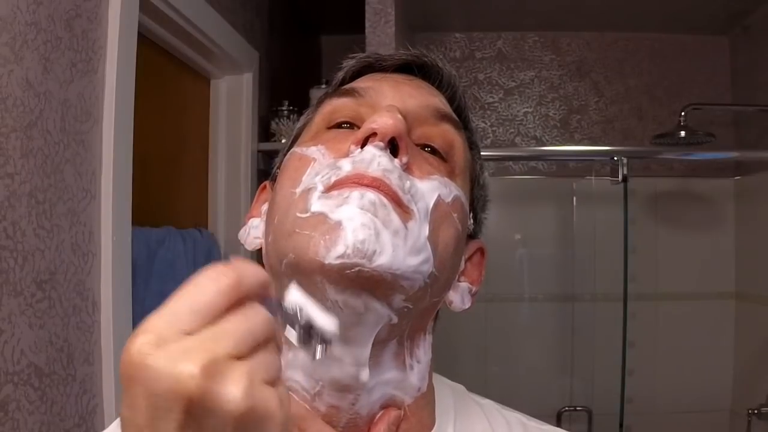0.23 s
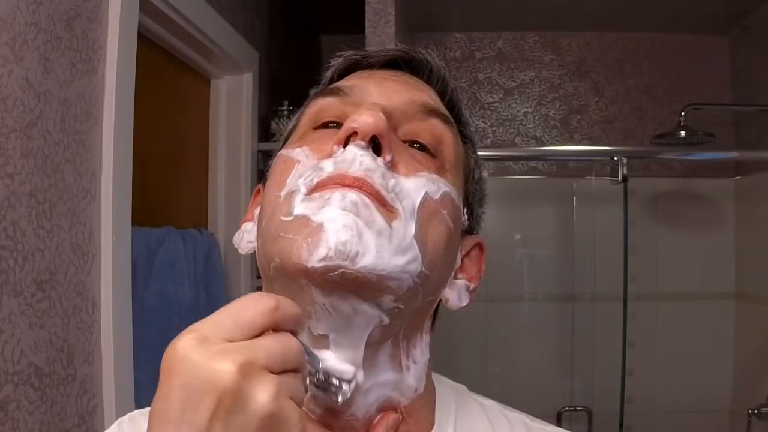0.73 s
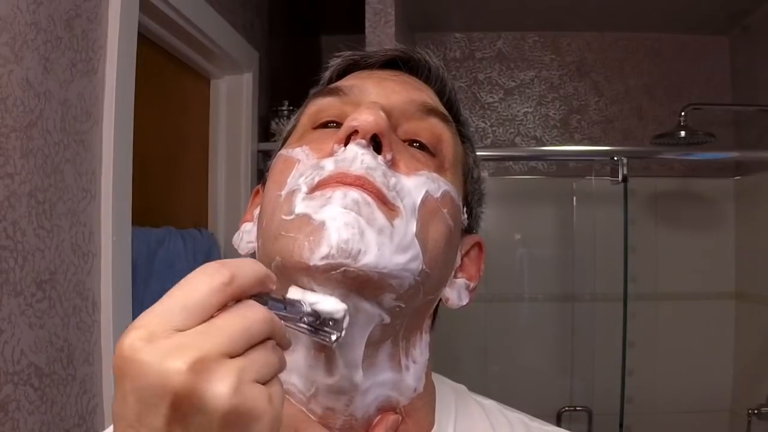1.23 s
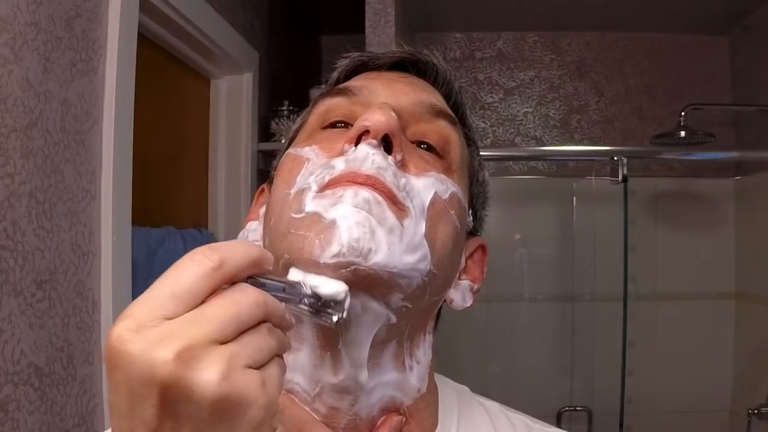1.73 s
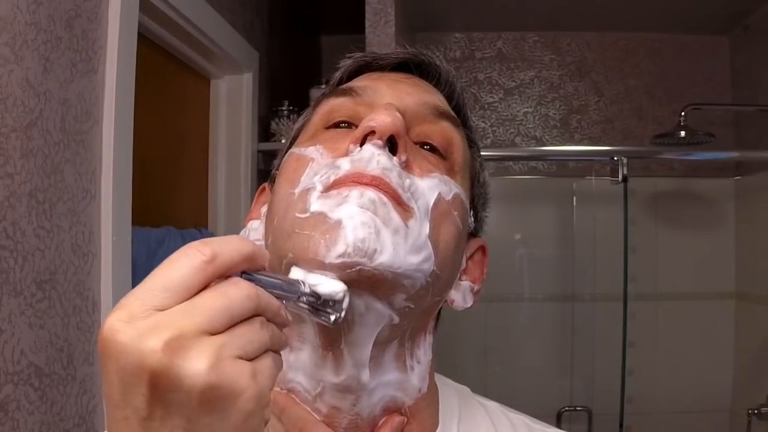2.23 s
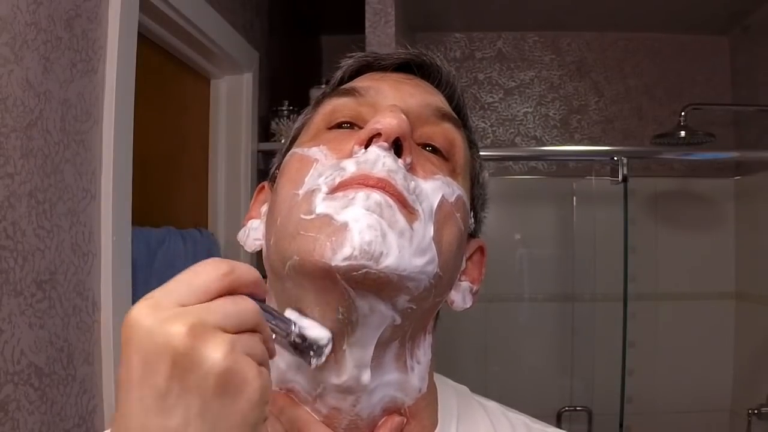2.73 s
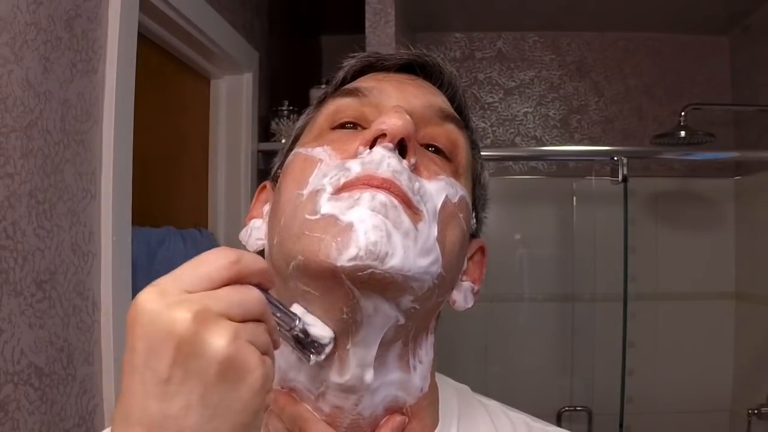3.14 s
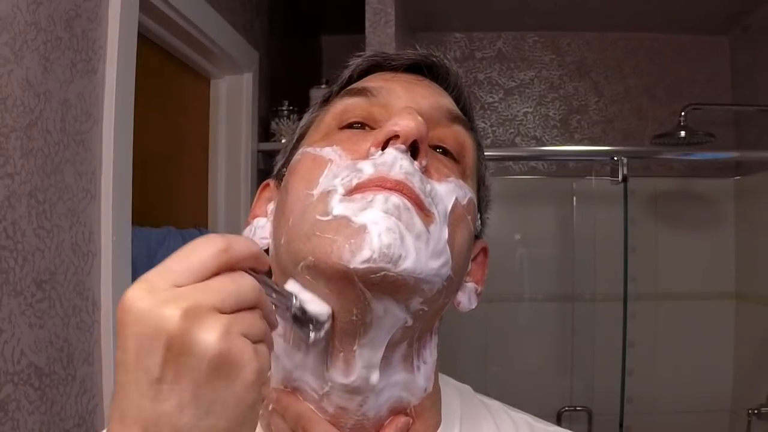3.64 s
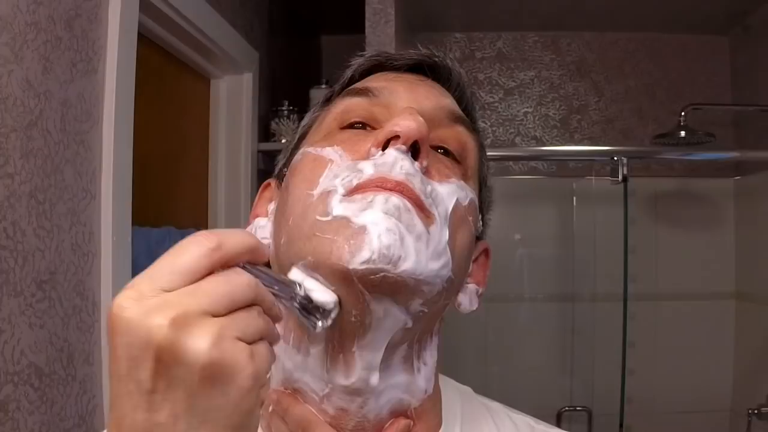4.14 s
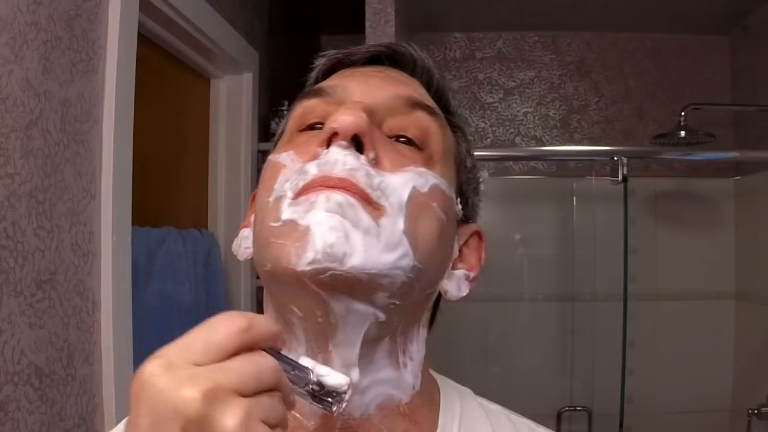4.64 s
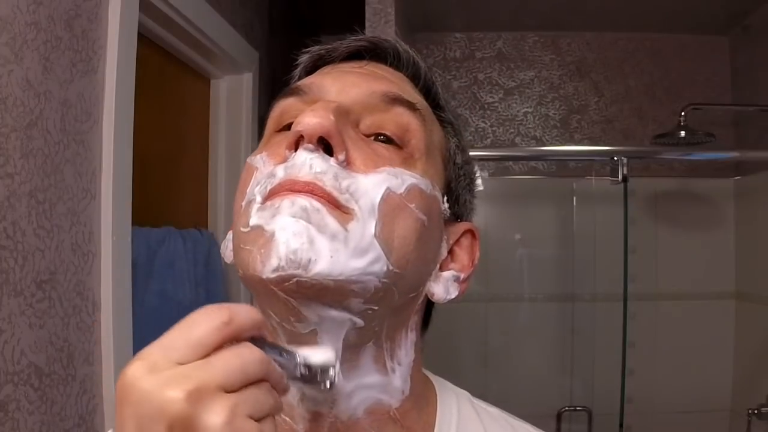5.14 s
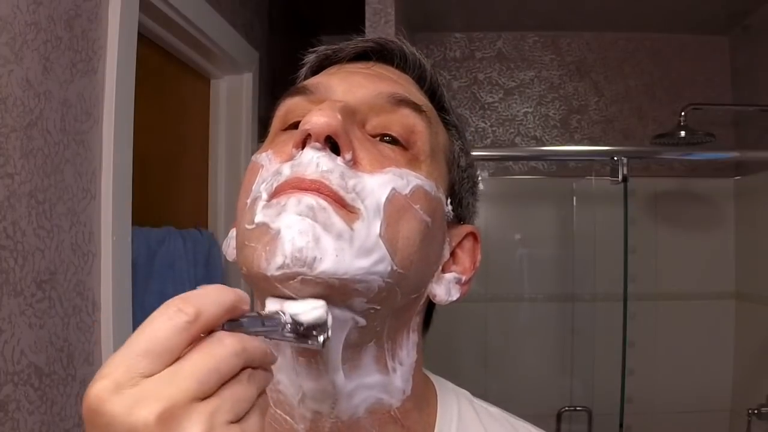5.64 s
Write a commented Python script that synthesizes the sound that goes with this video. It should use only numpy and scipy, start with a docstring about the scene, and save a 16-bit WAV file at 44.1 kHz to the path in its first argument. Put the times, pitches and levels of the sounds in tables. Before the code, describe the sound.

A safety razor scrapes wet, lathered stubble in a small tiled bathroom. A very brief rasp at 0 s is followed by a short scrape at 0.17, then a gap. Foamy swishes lead into softer strokes at 0.57 and 0.86. From 1.2 to 2.1 s firm, gritty strokes come about every 0.3 s, each swelling for under a tenth of a second and cutting off, with sharp snagging ticks. A fainter stroke at 2.3 carries a tiny rising squelch. Strokes from 2.95 to 3.7 sound higher and crisper, with soft low thuds near 3.0, 3.3 and 4.0. Scrapes at 4.25 and 4.5 are weak and duller; after a pause, longer low-pitched rasps with foam fall at 4.9, 5.2 and 5.6, including a strong snag near 5.3. Short dense tile echoes follow everything, over wavering low hum, rumble, light hiss and occasional soft sleeve rustle.

```python
"""Short rasping strokes of a safety razor through lathered stubble, in a small tiled bathroom.
Each hair that the blade cuts is a tiny snap that rings the razor; the guard rubs the wet skin below them.
Sharp snags, foamy swishes, soft thuds and one squelch break up the strokes.
The tiles throw all these back in dense echoes, over a low hum, a soft rumble, hiss and a rustle of cloth."""
import sys
import numpy as np
from scipy import signal
from scipy.fft import rfft, irfft
from scipy.io import wavfile
from scipy.ndimage import uniform_filter1d

SR = 44100
rng = np.random.default_rng(int(sys.argv[2]) if len(sys.argv) > 2 else 0)


def waveform_to_disk(signal):
    """Save audio, clipped to [-1, 1], as 16-bit WAV at the path in sys.argv[1]."""
    frames = np.transpose(np.atleast_2d(signal))
    scaled = np.clip(frames, -1, 1) * 32767
    samples = np.round(scaled).astype(np.int16)
    wavfile.write(sys.argv[1], SR, samples)


N = 258867

# Damped modes of razor head and handle. Each row: centre in Hz, width in Hz, relative level in dB.
RAZOR_MODES = [(1366, 40, -6), (1535, 28, 3), (1646, 32, 3), (1754, 30, -2), (2014, 20, 3), (2122, 50, -4),
               (2278, 30, -3), (2520, 90, -6), (2615, 30, 2), (2908, 55, -1), (3150, 150, -7),
               (3670, 60, -8)]
# Spectrum of the cutting rasp. Each row: frequency in Hz, relative density in dB per Hz.
RASP_SPECTRUM = [(200, -18.5), (900, -19.5), (1280, -9), (1620, 4), (1850, -0.5), (2060, 2.5), (2350, -3),
                 (2650, 5), (3050, 0.5), (3800, -1.5), (4900, -0.5), (5700, -4), (6700, -4.5), (8000, -8),
                 (16000, -23.5)]
# Spectrum of the crisp edge. Each row: frequency in Hz, relative density in dB per Hz.
CRISP_SPECTRUM = [(1500, -18.5), (4000, -1), (5600, -1), (6300, 2), (7700, 3.5), (8500, 5.5), (9200, 7.5),
                  (10300, 3.5), (12500, 3.5), (14000, -0.5), (16000, -3.5)]
# Spectrum of the guard on skin. Each row: frequency in Hz, relative density in dB per Hz.
RUB_SPECTRUM = [(100, -27.5), (180, -9.5), (240, -6), (310, -0.5), (375, -5.5), (450, 9), (505, -4),
                (580, 2), (700, -9.5), (840, -4.5), (950, -1), (1150, -3.5), (2000, -16)]


def razor(rasp_db=-3.0, modes_db=5.5, crisp_db=-2.5, rub_db=-0.5, snag_ring_db=-7,
          focus_width_hz=650, crisp_tilt_db_per_octave=5):
    """Snaps sound directly and through the razor's modes; harder strokes cut more hairs a second."""
    cut, crisp, rub = stroke_gains()
    hairs_per_s = 900 + 4000 * cut / cut.max()
    hairs = snaps(hairs_per_s, spread_db=2.0, smear=0.55) * tufts(depth_db=3.2, length_s=0.014)
    snag = snags()

    centre_hz, lift_db = blade_angle()
    drive = focus(cut * hairs + gain_of(snag_ring_db) * snag, centre_hz, lift_db, focus_width_hz)
    modes = sum(gain_of(db) * ring(drive, hz, width_hz) for hz, width_hz, db in RAZOR_MODES)
    rasp = colour(drive, RASP_SPECTRUM)

    # the thinnest hairs add a fizz of their own, brighter when the scrape sits higher
    thin_hairs = snaps(per_s=2500, spread_db=2.5, smear=0.33) * tufts(depth_db=5.5, length_s=0.016)
    fizz = evened(hairs + thin_hairs)
    tilt_db = crisp_tilt_db_per_octave * np.log2(centre_hz / 2150)
    edge = colour(tilted(crisp * fizz + snag, 10000, tilt_db), CRISP_SPECTRUM)

    skin = colour(rub * snaps(per_s=900, spread_db=4.0, smear=0.76), RUB_SPECTRUM)
    direct = gain_of(rasp_db) * rasp + gain_of(crisp_db) * edge
    return direct + gain_of(modes_db) * modes + gain_of(rub_db) * skin


# Strokes of the blade. Each row: start in seconds, swell in seconds, ease in seconds,
# relative cutting level in dB, level at first touch in dB re cutting, crispness in dB re cutting,
# relative skin rub in dB, band favoured by the blade's angle in Hz, lift of that band in dB.
STROKES = [ (0.0, .012, 0.013, -41, -1.5, 0, -58.5, 2100, 5),
           (0.169, 0.031, 0.026, -44, -6, 1, -62, 2040, 4),
           (0.565, 0.064, 0.044, -45, -18, -3, -59, 2500, 4),
           (0.86, 0.11, 0.032, -41, -16.5, 0.5, -60, 2850, 2.5),
           (1.189, 0.08, 0.048, -38.5, -12, 0, -57, 2630, 3),
           (1.489, 0.055, .054, -37.5, -10, -1, -52.5, 1940, 5),
           (1.765, 0.1, 0.017, -38.5, -13, -4, -57.5, 1740, 7),
           (2.064, 0.06, 0.033, -43, -8, -5.5, -63, 1710, 6.5),
           (2.31, 0.053, 0.018, -46.5, -11, -4, -63.5, 2600, 4.5),
           (2.536, .062, 0.019, -37.7, -19.5, -3.5, -56.5, 1900, 6),
           (2.96, 0.068, .04, -38, -17, -1, -51.5, 3100, 5.5),
           (3.272, 0.037, 0.043, -38.5, -9.5, -1.5, -50.5, 3030, 3),
           (3.63, 0.11, 0.041, -41.5, -21, 2.5, -52.5, 3360, 0.5),
           (3.966, 0.05, 0.045, -41, -7, -.5, -52, 2440, 2),
           (4.245, 0.029, 0.021, -46, -8, -1.5, -60, 1830, 9),
           (4.465, 0.037, 0.035, -50.3, -8, -6, -61.5, 1610, 9),
           (4.9, 0.087, 0.03, -43.5, -12, -1, -58, 1760, 2),
           (5.22, 0.085, 0.068, -41.5, -15, -2, -56, 1440, 4),
           (5.575, 0.097, 0.033, -39.5, -10.5, 0, -54, 1470, 4.5), ]
TOUCH_S, LIFT_TAU_S = 0.0053, 0.011  # linear fade-in before start, decay time constant after the ease
SWELL_CURVE = 1.09  # above 1, the climb in dB flattens toward the top
EASE_DB = -5.5  # the hand lightens before the blade lifts
DULL_TOUCH_DB, CRISP_END_DB = -7, 1  # dull in the lather at first, crisp at the end
RUB_SHARE = 0.35  # share of the swell and ease in dB that the rub follows


def stroke_gains():
    """Cutting, crispness and rub over time: the blade lands, bites harder, eases and lifts off."""
    t, gains = np.arange(N) / SR, np.zeros((3, N))
    for start, swell, ease, cut_db, touch_db, crisp_db, rub_db, _, _ in STROKES:
        age = t - start
        to_go = np.clip(1 - age / swell, 0, 1)
        easing = np.clip((age - swell) / ease, 0, 1)
        landing = np.clip(age / TOUCH_S + 1, 0, 1)
        lifting = np.exp(-np.maximum(age - swell - ease, 0) / LIFT_TAU_S)
        bite_db = touch_db * to_go ** SWELL_CURVE + EASE_DB * easing
        bright_db = crisp_db + DULL_TOUCH_DB * to_go + CRISP_END_DB * easing
        levels_db = [cut_db + bite_db, cut_db + bite_db + bright_db, rub_db + RUB_SHARE * bite_db]
        gains += landing * lifting * gain_of(levels_db)
    return gains


def blade_angle():
    """The favoured band and its lift over time; the hand turns from one stroke's angle to the next."""
    start, swell, *_, hz, lift_db = np.transpose(STROKES)
    return [np.interp(np.arange(N) / SR, start + swell, value) for value in (hz, lift_db)]


def snaps(per_s, spread_db, smear):
    """Random hairs of uneven thickness part under the blade, over a smear of fine friction; rms 1."""
    size = gain_of(spread_db * np.minimum(rng.exponential(1, N), 4))
    size = size * rng.choice([-1, 1], N)
    hairs = size * (rng.random(N) < per_s / SR) / np.sqrt(per_s)
    return evened(evened(hairs) + smear * rng.standard_normal(N))


def tufts(depth_db, length_s):
    """Hair grows in patches, so the cutting flutters within limits."""
    lowpass = signal.butter(2, 1 / length_s, fs=SR, output="sos")
    flutter = evened(signal.sosfilt(lowpass, rng.standard_normal(N)))
    return evened(gain_of(depth_db * np.tanh(flutter)))


# The blade lands or snags on a tuft. Each row: start in seconds, relative level in dB.
SNAGS = [(0.1685, -45), (0.217, -41), (0.635, -34), (1.187, -42), (1.208, -33), (1.4855, -46),
         (1.5777, -39), (1.7524, -37.5), (1.8697, -33), (2.132, -36), (2.158, -33.5), (2.9637, -40),
         (2.9771, -42), (3.272, -35), (3.291, -33), (3.731, -32), (3.9694, -42), (4.2384, -36),
         (4.4983, -40), (4.6024, -35), (5.2878, -30), (5.5855, -36)]


def snags(tick_tau_s=0.002, burst_tau_s=0.0086, burst_db=-9, level_db=-7):
    """A sharp tick as the blade catches, then the tuft gives way in a short burst."""
    envelope, t = np.zeros(N), np.arange(SR // 20) / SR
    shape = np.exp(-t / tick_tau_s) + gain_of(burst_db) * np.exp(-t / burst_tau_s)
    for start, db in SNAGS:
        add(envelope, start, gain_of(db + level_db) * shape)
    return envelope * snaps(per_s=9800, spread_db=4, smear=0.76)


# The guard ploughs through thick lather. Each row: start in seconds, length in seconds, level in dB.
SWISHES = [(0.565, 0.075, -53), (0.86, 0.1, -54), (3.633, .075, -56), (4.901, .07, -49.5),
           (5.224, 0.095, -52)]
# Spectrum of the swish. Each row: frequency in Hz, relative density in dB per Hz.
FOAM_SPECTRUM = [(200, -17.5), (480, 0), (720, -3), (980, 4.5), (1220, -3.5), (1650, 4), (1950, 1),
                 (2250, -8), (3000, -7), (4500, -10), (9000, -31)]


def lather(attack_s=0.011):
    """Tiny bubbles burst under the guard in a dull swish that thins as the blade takes over."""
    envelope = np.zeros(N)
    for start, length, db in SWISHES:
        t = np.arange(0, length, 1 / SR)
        thinning = np.sqrt(abs(1 - t / length))
        add(envelope, start, gain_of(db) * np.minimum(t / attack_s, 1) * thinning)
    return colour(envelope * snaps(per_s=1500, spread_db=2.5, smear=0.63), FOAM_SPECTRUM)


# The razor presses under the jaw. Each row: start in seconds, length in seconds, level in dB.
THUDS = [(2.985, .07, -53), (3.295, .075, -52), (3.975, .05, -50.5)]
# Spectrum of the thud. Each row: frequency in Hz, relative density in dB per Hz.
JAW_SPECTRUM = [(80, -20), (135, 4), (175, -14), (230, 6), (275, -3), (335, -4), (440, -6), (600, -14),
                (900, -25), (2000, -42)]


def thuds():
    """Each press swells and fades in the soft flesh under the jaw."""
    envelope = np.zeros(N)
    for start, length, db in THUDS:
        add(envelope, start, gain_of(db) * np.sin(np.pi * np.arange(0, length, 1 / SR) / length))
    return colour(envelope * rng.standard_normal(N), JAW_SPECTRUM)


def squelch(start_s=2.354, length_s=0.022, from_hz=380, to_hz=600, peak_db=-49, rough=0.15):
    """A pocket of air squeezed out of the lather rises unevenly in pitch."""
    out, t = np.zeros(N), np.arange(0, length_s, 1 / SR)
    glide_hz = from_hz + (to_hz - from_hz) * t / length_s
    hz = glide_hz * (1 + rough * drift(length_s=0.002)[:len(t)])
    tone = np.sin(2 * np.pi * np.cumsum(hz) / SR)
    add(out, start_s, gain_of(peak_db) * np.sin(np.pi * t / length_s) * tone)
    return out


def bathroom(x, wet_db=-3, sway_hz=1.3, count=5):
    """The moving hand blends from one echo pattern to the next, in a repeating cycle."""
    place = np.arange(N) / SR * sway_hz * 2 * np.pi
    weights = np.array([np.maximum(np.cos(place - 2 * np.pi * k / count), 0) ** 2 for k in range(count)])
    weights = weights / np.linalg.norm(weights, axis=0)
    return x + gain_of(wet_db) * sum(reflections(x * w) for w in weights)


def reflections(x, first_s=0.002, size=256):
    """Dense echoes from the tiles, each band dying at its own speed."""
    # Each row: frequency in Hz, time to fall 60 dB in seconds.
    t60 = [(200, 0.69), (800, 0.37), (2000, 0.48), (5500, 0.42), (14000, 0.42)]
    late_enough = np.arange(SR) / SR > first_s
    taps = rng.standard_normal(SR) * (rng.random(SR) < 5000 / SR) * late_enough  # 5000 echoes/s
    hz, t, z = signal.stft(taps, SR, nperseg=size)
    decay = gain_of(-60 * t / read(t60, hz)[:, None])
    tail = signal.istft(z * decay, SR, nperseg=size)[1]
    return signal.fftconvolve(x, tail / np.linalg.norm(tail))[:N]


def background():
    """Steady rumble and hiss, a wavering low hum and the rustle of the arm."""
    return rumble_and_hiss() + hum() + rustle()


# Spectrum of the quiet room. Each row: frequency in Hz, relative density in dB per Hz.
FLOOR_SPECTRUM = [(20, 6), (32, 4), (45, -2.5), (80, 1), (128, 1), (160, -9.5), (290, -10), (500, -14),
                  (800, -16.5), (1300, -15.5), (2500, -19.5), (4000, -20), (15000, -25)]
# Likeness of the two channels. Each row: frequency in Hz, correlation from -1 to 1.
CHANNEL_LIKENESS = [(30, 0.95), (200, 0.94), (500, 0.91), (1500, 1), (5000, 1), (15000, 0.99)]


def rumble_and_hiss(rms_db=-54.72):
    """Shaped noise; mid and side are weighted so that the two channels are alike as tabled."""
    hz = np.fft.rfftfreq(N, 1 / SR)
    same = np.clip(read(CHANNEL_LIKENESS, hz), -1, 1)
    noise = rfft(rng.standard_normal((2, N))) * gain_of(read(FLOOR_SPECTRUM, hz))
    mid, side = noise * np.sqrt([1 + same, 1 - same])
    return gain_of(rms_db) * evened(irfft([mid + side, mid - side], N))


# Level of the low hum before its waver. Each row: time in seconds, rms level in dB.
HUM_LEVEL = [(0, -57), (.19, -50.5), (.28, -59.5), (1, -56.5), (1.7, -59.5), (2.2, -56.5), (3.1, -61.5),
             (4.3, -56.5), (5.87, -55.5)]


def hum(centre_hz=60.1, wander_hz=2, waver_db=2.5, waver_s=0.093):
    """A low sine whose pitch wanders and whose level wavers (both spreads are rms)."""
    level_db = np.interp(np.arange(N) / SR, *np.transpose(HUM_LEVEL)) + waver_db * drift(waver_s)
    wander = wander_hz * evened(uniform_filter1d(rng.standard_normal(N), size=4000))
    return np.sqrt(2) * gain_of(level_db) * np.sin(2 * np.pi * np.cumsum(centre_hz + wander) / SR)


def rustle(level_db=-4):
    """The arm and shirt shift with a soft low rustle of shaped noise."""
    # Each row: frequency in Hz, relative density in dB per Hz.
    cloth = [(90, -22.5), (132, -1.0), (175, -21.0), (215, 1.0), (240, -0.5), (310, -3.5), (400, -18.5),
             (800, -34)]
    return gain_of(level_db) * arm_gain() * colour(rng.standard_normal(N), cloth)


# Moves of the arm. Each row: loudest time in seconds, decay time constant in seconds, relative level in dB.
ARM_MOVES = [(0.31, 0.11, -53), (1.46, 0.22, -55.5), (1.73, .14, -58.5), (2.98, .3, -56), (3.71, .2, -58.5),
             (4.19, .17, -54.5), (5.46, .25, -55)]


def arm_gain(rise_tau_s=0.054, rest_db=-64.5):
    """Each move of the arm builds quickly and dies away, over a fainter rustle at rest."""
    t, moves = np.arange(N) / SR, np.zeros(N)
    for loudest, fade, db in ARM_MOVES:
        moves += gain_of(db) * np.exp(np.minimum((t - loudest) / rise_tau_s, (loudest - t) / fade))
    return np.hypot(gain_of(rest_db), moves)


def gain_of(db):
    """Decibels to gain."""
    return 10 ** (np.asarray(db) / 20)


def evened(x):
    """Scales to rms 1."""
    return x / np.sqrt(np.mean(x ** 2) + 1e-20)


def read(points, hz):
    """Reads a table on a log-frequency axis."""
    f, value = np.transpose(points)
    return np.interp(np.log(hz + 1), np.log(f + 1), value)


def add(mix, start_s, sound):
    """Adds a sound into the mix in place."""
    part = mix[max(round(start_s * SR), 0):][:len(sound)]
    part += sound[:len(part)]


def colour(x, points, size=2048):
    """Causal minimum-phase filter of unit energy, so that snaps keep their sharp fronts."""
    log_gain = np.log(gain_of(read(points, abs(np.fft.fftfreq(size, 1 / SR)))))
    taps = np.fft.ifft(np.exp(np.conj(signal.hilbert(log_gain)))).real
    return signal.oaconvolve(x, taps / np.linalg.norm(taps))[:N]


def ring(x, hz, width_hz):
    """One damped mode, with gain 1 at its centre."""
    return signal.lfilter(*signal.iirpeak(hz, hz / width_hz, fs=SR), x)


def focus(x, hz, lift_db, width_hz):
    """A broad resonance that follows the curve hz lifts its band; the overall level stays about the same."""
    turn = np.exp(2j * np.pi * np.cumsum(hz) / SR)
    r = np.exp(-np.pi * width_hz / SR)
    # shift the band to 0 Hz, lowpass, shift back
    band = 2 * (turn * signal.lfilter([1 - r], [1, -r], x / turn)).real
    return (x + (gain_of(lift_db) - 1) * band) / gain_of(lift_db / 2)


def tilted(x, hz, db):
    """Positive db lifts what lies above hz and lowers what lies below it; negative does the reverse."""
    low = signal.lfilter(*signal.butter(1, hz, fs=SR), x)
    return low * gain_of(-db / 2) + (x - low) * gain_of(db / 2)


def drift(length_s):
    """Smoothed chance of rms 1 that changes over about length_s."""
    hz = np.fft.rfftfreq(N, 1 / SR)
    return evened(irfft(rfft(rng.standard_normal(N)) * np.exp(-(hz * length_s) ** 2), N))


def scene():
    """The razor is straight ahead, equal in both channels; the background is added without echoes."""
    return bathroom(razor() + lather() + thuds() + squelch()) + background()


def record(dry, edge_hz=15450):
    """Band limit: a steep linear-phase lowpass."""
    taps = signal.firwin(511, edge_hz, window=("kaiser", 9), fs=SR)
    return signal.oaconvolve(dry, taps[None], "same")


dry = scene()
out = record(dry)
waveform_to_disk(out)
```